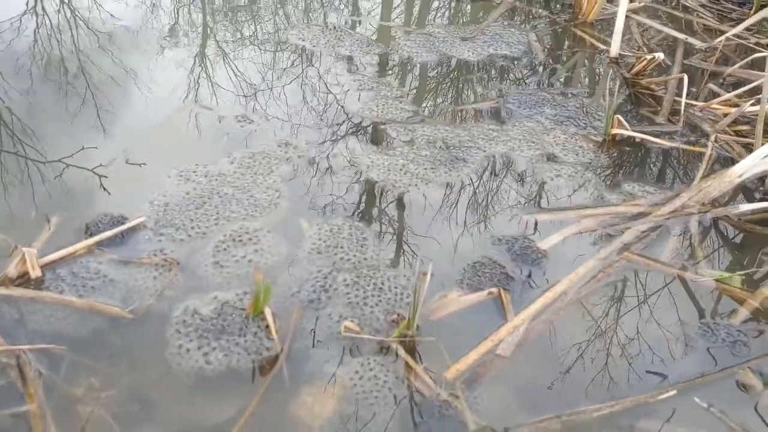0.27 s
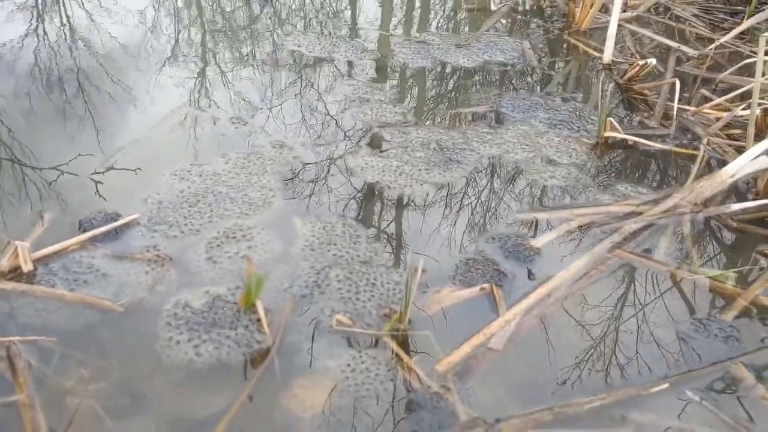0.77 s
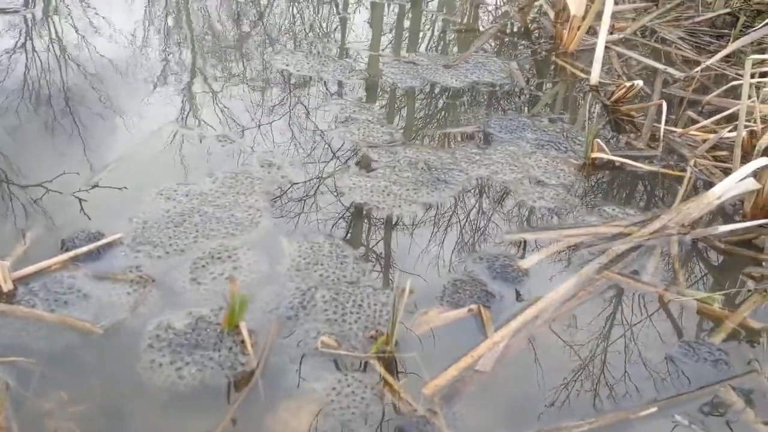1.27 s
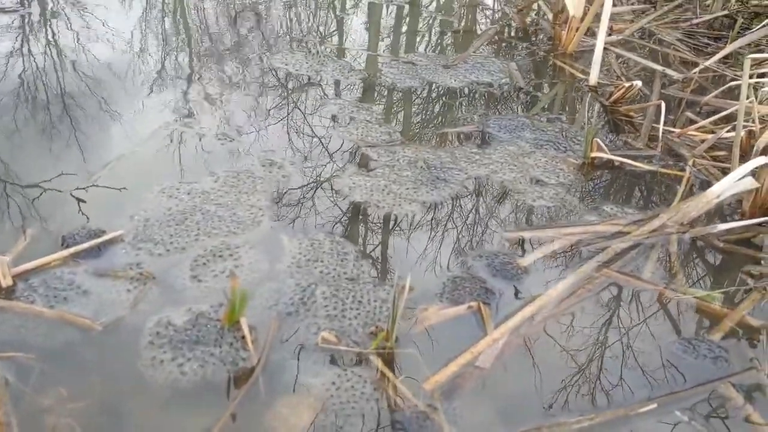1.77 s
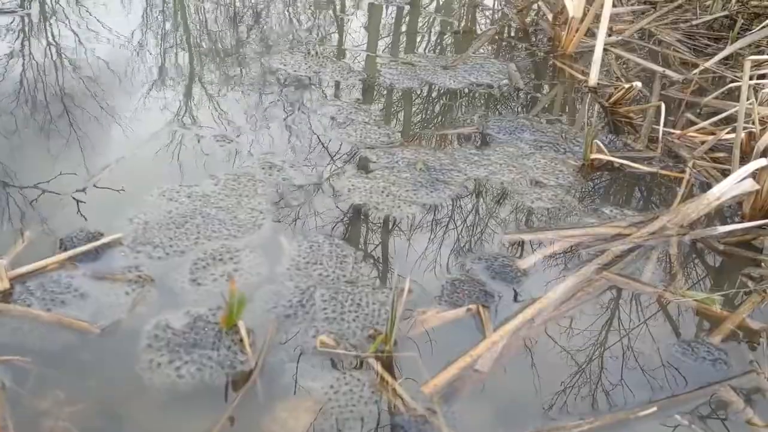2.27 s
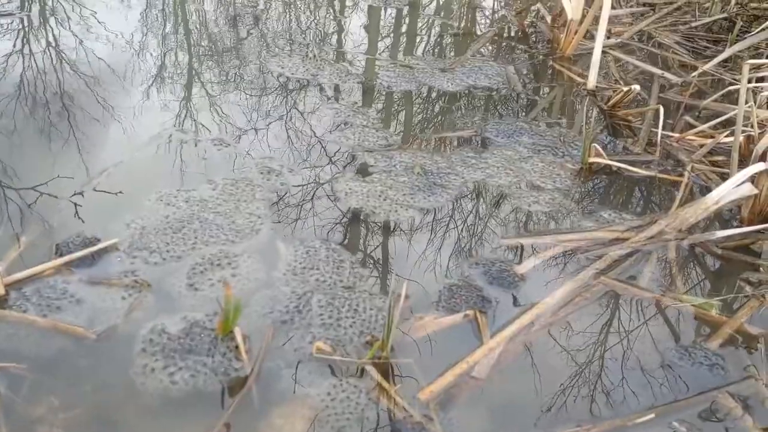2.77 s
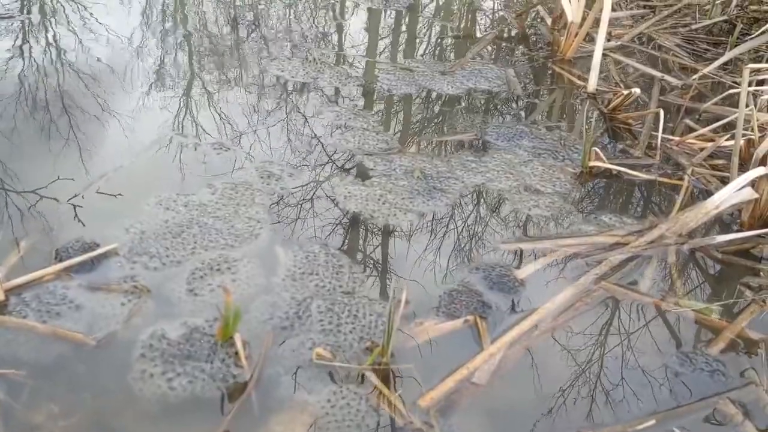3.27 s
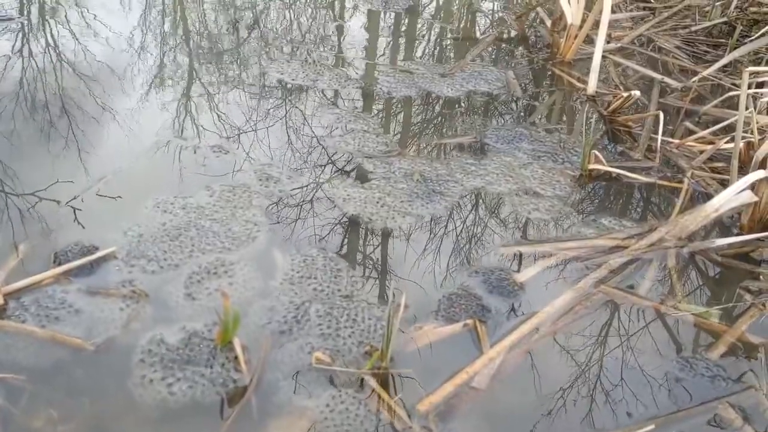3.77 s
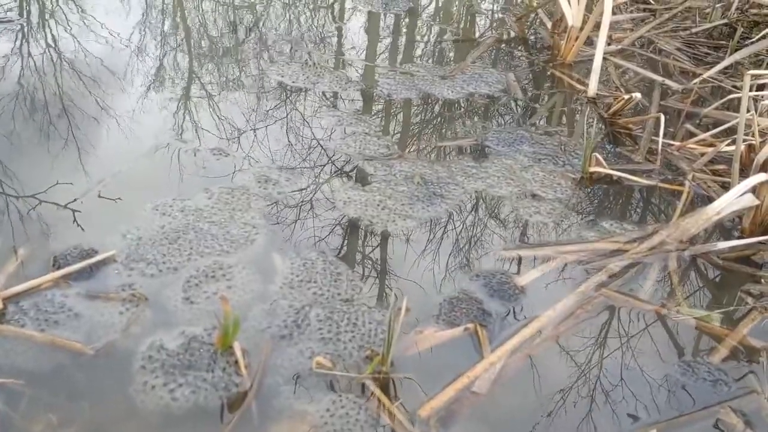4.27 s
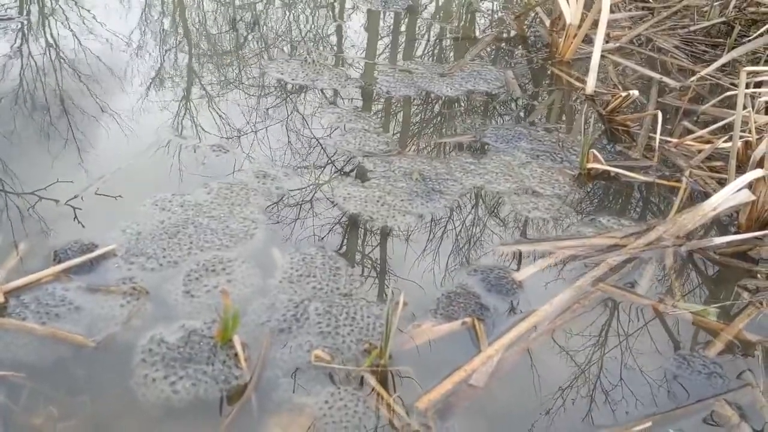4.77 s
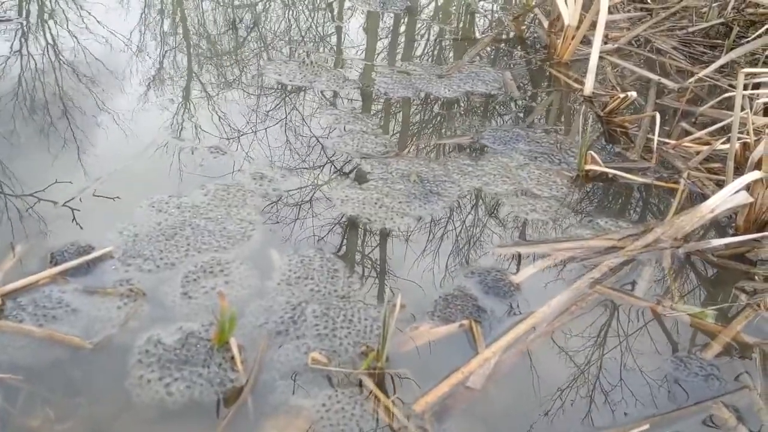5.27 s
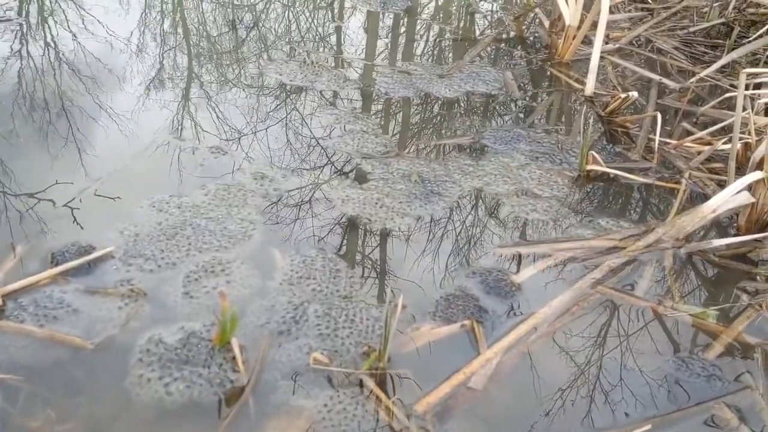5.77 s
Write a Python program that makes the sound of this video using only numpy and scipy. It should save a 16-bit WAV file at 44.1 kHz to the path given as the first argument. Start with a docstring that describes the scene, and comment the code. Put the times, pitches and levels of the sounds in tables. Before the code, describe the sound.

A quiet woodland pool bank, heard in close stereo. From the start, dry reed stalks snap sharply, mainly left of centre, with bright clicks around 0.1 seconds and again near 0.8, one duller knock falling to the right at about 0.7. Papery leaves tick and hiss between them, with small damp crunches. Another crackling cluster comes from 1.3 to 1.7. From about 1.8 to 2.5 a faint, distant bird whistles four falling slurs, then four low, rough two-voiced chirps from 2.6 to 3.3. The loudest, densest snapping bursts at 3.1 to 3.3, thinning until 4.1. The bird repeats four slurs from 4.2 to 4.9 in a calmer gap. A crack at 5.2 and light crackling from 5.4 close it. Throughout, soft low wind buffets, a distant traffic drone swelling slightly near 4.5, and airy hush.

```python
"""Snapping reeds at a woodland pool

Close by, dry stalks snap under shifting weight: noise bursts with abrupt fronts, split into three bands.
Leaves rustle as random ticks and hiss; stems knock as damped resonances; damp litter crunches in grains.
A songbird far off repeats a falling slur, then four low two-voiced chirps, then the slur again: gliding
sines with an octave, followed by a faint forest echo. Light wind rumbles on the microphone over the drone
of distant traffic and the hush of the wood, all three made of coloured noise."""
import sys
import numpy as np
from scipy import signal
from scipy.fft import rfft, irfft, next_fast_len
from scipy.io import wavfile
from scipy.ndimage import uniform_filter1d

SR = 44100
rng = np.random.default_rng(int(sys.argv[2]) if len(sys.argv) > 2 else 0)


def unload_wav(signal):
    """Save mono or channel-first audio to the path in sys.argv[1] as 16-bit WAV at rate SR, clipped to [-1, 1]."""
    wavfile.write(
        sys.argv[1],
        SR,
        np.round(np.clip(np.atleast_2d(signal).T, -1, 1) * 32767).astype(np.int16),
    )


N = 265305
TIME = np.arange(N) / SR

# loudest stalks snapping: crack_s, level_db (power of both ears together),
# woodiness_db (middle over treble), fizz_db (top over treble), left_minus_right_db
SNAPS = [(0.0134, -42.5, -15, 0, -9), (0.031, -53, 0.0, -8.0, -13), (0.0758, -45.5, -11, -5.0, -8),
         (0.1247, -37.5, -14, -1, -10), (0.1292, -27.5, 0, -6, -6), (0.1709, -38.5, -15, -12.0, -5.0),
         (0.2757, -48, -14.0, -15, -7), (0.3162, -45, -10, 3.0, -2.0), (0.3388, -49, -11, 4, -6),
         (0.4788, -48.5, -3, 3, -9), (0.5041, -51.0, -3.0, -1.0, -14), (0.5281, -62, -9, -7.0, -1.0),
         (0.5411, -46, -1, -17.0, -7), (0.5618, -65, -6.0, 3.0, -6.0), (0.5889, -53.0, 0, -4.0, -7),
         (0.7355, -40.5, 2, -14, 8), (0.7852, -53.5, -2.0, -7, -10), (0.8175, -30.5, 0, -8, -5),
         (0.8323, -43, 0, -5.0, -6), (0.8445, -35.5, 5, -5, -5.0), (0.8524, -41, -5, -5.0, -6.0),
         (1.3258, -44.5, -4, -6.0, -3), (1.3724, -48, 14, 4, -3), (1.3826, -59, -3.0, -11.0, -1.0),
         (1.3965, -61, 0.0, -3.0, 0), (1.4101, -58, 4, -3.0, -3.0), (1.4154, -47, -2, -9.0, -3.0),
         (1.4298, -45, -1, -4.0, -2.0), (1.4695, -40.5, -3.0, 8, -7), (1.4742, -40, 9, -1, 2),
         (1.5094, -52, 0, 5, 1), (1.5199, -42.0, -11, 10, -9), (1.5242, -38.5, -11, -4.0, -2.0),
         (1.5355, -38.5, 9, 1.0, -2.0), (1.5434, -44, 0, -6.0, -2.0), (1.6844, -48, 10, -3.0, -5),
         (2.1663, -52, 0.0, 2.0, 4.5), (2.1887, -43.5, 8, 3.0, -7), (2.2027, -50, -1.0, 3, -8),
         (2.3372, -51, -1.0, 12, -10), (2.4267, -36, -4.0, 4, -3), (2.6248, -37.5, -6, -9, -4.0),
         (2.6325, -46.0, -15, -12.0, -3.0), (2.695, -51.5, -6.0, -3, -4.0),
         (2.8076, -52.5, -4.0, -3.0, -6.0), (2.8315, -49, -8, 6, -5.0), (2.8635, -38, -9, -1, -6),
         (2.8776, -45.5, -4, -5.0, -1.0), (3.0495, -51, -11, -9.0, -5), (3.1002, -26, -9.5, -1, -5.5),
         (3.1205, -48, -13, 2, -5.0), (3.1339, -50.5, -13, 4, -3), (3.1492, -57, -14, 1, -4.0),
         (3.1737, -24.5, -6.5, 5, -7.5), (3.1778, -41, 2, -5.0, -4.0), (3.1867, -36, -15, 5, -10),
         (3.2046, -42.0, -6.0, -2.0, -4.0), (3.2093, -36.5, -4, -3.0, -4.0), (3.2377, -40, -9, 5, -5),
         (3.2466, -27.5, -7, -4.0, -6), (3.2627, -46, -17, -1, -8), (3.2791, -34.5, -5, 1, -7),
         (3.2946, -49, -2, -8, -1), (3.2986, -33, -7, 1.0, -9), (3.345, -44.5, -8, -3, -8),
         (3.351, -45, 0, 3, -3.0), (3.4243, -33, 6, 5, -9), (3.4984, -47.5, -5.0, 11, -11),
         (3.6016, -41, 2, 1, -2), (3.6745, -33, 4.5, 7.5, -3), (3.7357, -45.5, -9, -9, -9),
         (3.7883, -55.5, -9, -5.0, -8), (3.8597, -45, 2, -1, -2.0), (3.8795, -49.5, -9, -1, -5.0),
         (4.0245, -39, -7, 6, -11), (4.0385, -43.5, -12, -5, -2), (4.132, -53.5, -5, 8, -8.0),
         (5.1854, -34, 0.5, 2, -10.5), (5.2372, -52, 1, 0, -11), (5.3673, -51.5, -3, 1, -8),
         (5.4814, -41, -9, 3.0, -8.0), (5.501, -53, -2.0, -2.0, -5), (5.536, -58, -8.0, 5, -7),
         (5.5545, -48, -13, 9, -6), (5.5628, -47.0, -13, 0, -4.0), (5.5725, -42.5, -4, -11, -5),
         (5.5862, -43, 4, -1.0, -2), (5.601, -41.5, 0, -2.0, -6), (5.6128, -43, -2, -8, -6),
         (5.7785, -44, 4, -13, -4), (5.9257, -45.5, 7, -1.0, -6), (5.9506, -47, 0, 5, -3.0),
         (5.9827, -53, 0.0, 1, -6.0)]
# middle, treble and top range of a snap: low_hz, high_hz
SNAP_BANDS = [(1200, 7000), (7000, 12500), (12500, 16500)]
# random lesser stalks; rows: level over the leaves, woodiness, fizz, left minus right: typical_db, spread_db
SPLINTER_TRAITS = [(6.5, 6), (-4, 7), (-4, 7), (-2, 5)]
# shifts of weight pressing the dry leaves: peak_s, half_length_s, level_db
PRESSES = [(0.0, .03, -53), (0.135, .04, -53.5), (0.29, .07, -63), (0.56, .07, -61), (0.72, .05, -65.5),
           (0.86, .07, -63), (1.36, .06, -61), (1.515, .04, -56.5), (1.695, .04, -61.5), (2.03, .04, -68.5),
           (2.275, .06, -59), (2.46, 0.037, -65), (2.65, .05, -65.5), (2.9, .1, -69), (3.21, .08, -61),
           (3.42, 0.1, -67), (3.7, .11, -67), (4.1, .09, -68.5), (4.47, 0.037, -69.5), (4.64, .07, -65.5),
           (4.85, .07, -70.5), (5.195, .02, -65), (5.59, .05, -64), (5.77, .05, -66)]
# duller knocks of thick stems: crack_s, resonance_hz, level_db, half_width_octaves
KNOCKS = [(0.09, 1960, -59.5, 0.087), (0.7358, 675, -48.5, 0.41), (0.7498, 1700, -60, 0.54),
          (1.293, 2000, -60.5, 0.94), (1.326, 1560, -57.5, .5), (1.339, 1500, -66, .4),
          (1.36, 1290, -65, 0.34), (1.3735, 4280, -56.5, 0.045), (2.425, 1690, -56.5, 0.33),
          (3.1737, 3120, -54, 0.16), (3.4243, 3330, -49, 0.11)]
# damp litter squashed on the bank: peak_s, length_s, level_db
SQUASHES = [(0.128, 0.0033, -70), (0.138, 0.033, -83), (0.353, 0.082, -73), (0.91, 0.011, -66.5),
            (1.322, 0.02, -81), (2.295, 0.11, -73), (5.162, 0.025, -68.5)]
# falling slurs of the bird: accent_s, relative_level_db, lead_in_db (relative to the accent)
SLURS = [(1.886, -61, -10), (2.052, -59.5, 1.5), (2.265, -58.5, 2), (2.487, -58.5, 3), (4.313, -59.5, -11),
         (4.476, -58.5, -3), (4.688, -59, -2), (4.872, -60.5, -1)]
# course of one slur: from_accent_s, pitch_hz, fundamental_db, octave_db
SLUR_COURSE = [(-.112, 3500, -24, -40), (-.1, 3920, -13, -38), (-.084, 4110, -10.5, -32),
               (-.062, 3970, -12, -24), (-.04, 3620, -10.5, -9), (-.026, 3370, -7, -4),
               (-.01, 3110, -8, -12), (0, 2810, 5, -6), (.004, 2700, -6, -12), (.01, 2400, -22, -32)]
# low chirps of the bird: accent_s, pitch_hz, relative_level_db, length_ratio
CHIRPS = [(2.633, 2220, -51, 1.14), (2.847, 2184, -50, .9), (3.047, 2024, -53, 1.05),
          (3.252, 2007, -54, 0.84)]
# clear voice of a chirp: from_accent_s (before stretching), pitch_ratio, fundamental_db, octave_db
CLEAR_VOICE = [(-.021, .9, -26, -40), (-.014, .96, -6, -32), (-.006, 1, 0, -30), (.003, 1, 1, -30),
               (.011, .96, -2, -28), (.017, .88, -11, -28), (.024, .72, -26, -40)]
# rough second voice of a chirp: from_accent_s (before stretching), pitch_hz, fundamental_db, octave_db
ROUGH_VOICE = [(-.026, 1200, -32, -26), (-.019, 1430, -24, -9), (-.012, 1640, -26, -14),
               (0, 1880, -26, -21), (.012, 1660, -16, -13), (.021, 1480, -10, -6), (.028, 1340, -16, -12),
               (.035, 1180, -26, -24)]
# relative power spectra: frequency_hz, density_db (per Hz)
REED_SPECTRUM = [(1000, -20.5), (2300, -29.5), (3200, -15), (4800, -8.5), (5600, 0), (6600, -4),
                 (8100, -5.5), (9400, 1), (10200, -3), (11600, -3), (12500, -12.5), (13900, -4),
                 (15300, -9.5), (16500, -20.5)]
LEAF_SPECTRUM = [(1000, -14.5), (2500, -11.5), (4500, 2), (5800, -3), (8000, -3.5), (9500, 1.5),
                 (11500, -6), (12700, -9.5), (14000, 2.5), (15300, -6), (16300, -29)]
LITTER_SPECTRUM = [(400, -7), (900, -10), (1500, 3), (3000, -5.5), (6000, -2.5), (12000, -21)]
AIR_SPECTRUM = [(180, -24), (300, -1), (511, -3.5), (667, -10.5), (1560, -18), (1690, -18.5), (3030, -16.5),
                (4830, -20.5), (5700, -18.5), (14200, -22.5), (16000, -38)]
WIND_SPECTRUM = [(12, -2), (28, 3), (50, -5.5), (80, -11.5), (130, -20), (250, -35.5), (500, -51.5)]
TRAFFIC_SPECTRUM = [(40, -13), (90, -3.5), (140, -2), (190, -6.5), (240, -9), (300, -22.5), (480, -41),
                    (800, -30.5)]
# steady breeze on the microphone: time_s, level_db
BREEZE = [(0, -47.5), (.6, -49.5), (2.0, -49.5), (3.2, -54), (3.8, -49), (4.75, -58.5), (5.2, -48),
          (6.02, -52.5)]
# single buffets on top of the breeze: peak_s, level_db
BUFFETS = [(.06, -40.5), (.17, -40), (.29, -43.5), (.78, -39.5), (1.04, -41.5), (1.97, -48), (2.11, -43.5),
           (2.909, -40.5), (3.32, -52), (3.99, -49.5), (5.3, -42), (5.83, -41.5), (6.0, -44.5)]
# course of the traffic: time_s, relative_level_db
ROAD = [(0, -66), (1.2, -65), (2.4, -63), (3.6, -65), (4.6, -63.5), (6.02, -63.5)]
# tones that swell out of the traffic: peak_s, length_s, frequency_hz, level_db
DRONES = [(3.25, .4, 136, -65), (4.5, .22, 139, -59), (4.8, .4, 530, -79)]

LEAD = SR // 200   # samples kept before each crack
SPLINTERS_PER_S, SPLINTER_RATE_POWER = 40, 0.6   # rate at the mean pressure; exponent of the pressure
RUB_SHARE = 0.25   # amplitude of hiss against ticks
RESTING_LEAVES_DB = -75   # the leaves never lie quite still
BUFFET_HALF_S = 0.027
# reflections from the reed bed against the direct sound
SNAP_ECHO_DB, LEAF_ECHO_DB, BANK_ECHO_DB = -14, -6.5, -8
CUTOFF_HZ = 16100


def reeds(pressure, lag_s=.000083, lag_spread_s=.000008):
    """Brittle fracture: each stalk cracks with its own mix of bands and its own level between the ears."""
    s, db, woodiness, fizz, left_db = np.vstack([SNAPS, splinters(pressure)]).T
    lags = lag_s + lag_spread_s * rng.standard_normal(len(s))
    stalk = colour(signal.unit_impulse(N), REED_SPECTRUM)[:LEAD]
    bursts = fractures(len(s), tear_s=.00065, crack=3.0, lead_s=.0003)
    cracks = signal.lfilter(stalk, [1], bursts)

    # the three bands together carry the level of the snap
    treble_db = db - 10 * np.log10(1 + from_db(woodiness) ** 2 + from_db(fizz) ** 2)
    mixed = 0
    for band_hz, share_db in zip(SNAP_BANDS, (woodiness, 0, fizz)):
        band = signal.butter(4, band_hz, "band", fs=SR, output="sos")
        mixed = mixed + at_level(signal.sosfilt(band, cracks), treble_db + share_db)

    left_over_right = from_db(left_db[:, None])
    right = mixed / np.sqrt(1 + left_over_right ** 2)
    left = right * left_over_right
    return np.array([placed(s, left), placed(s, delayed(right, lags[:, None]))])


def splinters(pressure, count=400):
    """Stress-driven failure: rows like those of the snaps, more frequent and louder under pressure."""
    rate = SPLINTERS_PER_S * (pressure / pressure.mean()) ** SPLINTER_RATE_POWER
    due = np.cumsum(rate) / SR
    chance = rng.uniform(-0.82, 1, (count, 5))
    at = np.searchsorted(due, np.arange(count) + 1 + chance[:, 0])   # uneven intervals
    inside = at < N
    typical, spread = np.transpose(SPLINTER_TRAITS)
    traits = typical + spread * chance[inside, 1:]
    at = at[inside]
    level_db = 20 * np.log10(pressure[at]) + traits[:, 0]
    return np.c_[at / SR, level_db, traits[:, 1:]]


def fractures(count, tear_s, crack, lead_s=0.00042):
    """Fibre rupture: noise grows as fibres give, peaks in a crack and decays with the tear; one a row."""
    t = (np.arange(4 * LEAD) - LEAD) / SR
    envelope = np.exp(-np.maximum(t / tear_s, -t / lead_s))
    bursts = rng.standard_normal((count, len(t))) * envelope
    bursts[:, LEAD] = crack
    return bursts


def leaves(pressure, grains_per_s=520, spread_db=6.0):
    """Friction noise: countless tiny ticks of uneven size over the soft hiss of blades rubbing."""
    sizes = from_db(spread_db * np.minimum(rng.exponential(1, N), 3)) * rng.choice([-1, 1], N)
    ticks = rms_one(sizes * (rng.random(N) < grains_per_s / SR))
    rustle = rms_one(ticks + RUB_SHARE * rng.standard_normal(N))
    return colour(rustle * pressure, LEAF_SPECTRUM)


def bank():
    """Heavy contact on the bank: thick stems knock by resonance."""
    return sum(knock(*row) for row in KNOCKS) + litter()


def knock(s, hz, db, half_band_octaves):
    """Impact resonance: a crack in a thick stem, heard through its quickly damped resonance."""
    half = np.clip(half_band_octaves, .02, 1.2)
    band = signal.butter(1, hz * 2 ** np.array([-half, half]), "band", fs=SR, output="sos")
    ring = signal.sosfilt(band, fractures(count=1, tear_s=.0005, crack=6.0))
    return placed([s], at_level(ring, [db]))


def litter(grains_per_s=1500):
    """Granular crushing: damp litter gives way in random grains, with a dull crunch."""
    load = sum(from_db(db) * np.exp(-.5 * ((TIME - s) / length) ** 2) for s, length, db in SQUASHES)
    grains = rms_one(rng.standard_normal(N) * (rng.random(N) < grains_per_s / SR))
    return colour(grains * load, LITTER_SPECTRUM)


def reed_bed(x, t60, bright_hz=6000):
    """Dense reflection: noise follows the sound's power and dies quickly, low and high bands apart."""
    r = from_db(-120 / (t60 * SR))   # decay of power per sample
    out = 0
    for kind in ("low", "high"):
        band = signal.butter(3, bright_hz, kind, fs=SR, output="sos")
        power = signal.lfilter([1 - r], [1, -r], signal.sosfilt(band, x) ** 2 + 1e-20)
        reflections = colour(wide_noise(alike=1.0), REED_SPECTRUM)
        out = out + np.sqrt(power) * rms_one(signal.sosfilt(band, reflections))
    return out


def scatter(x, t60):
    """Diffuse reflection from stalks or trunks: decaying noise tails, different on each side."""
    t = TIME[:SR]
    decay = from_db(-60 * t / t60)
    tails = [rms_one(rng.standard_normal(SR) * decay) / np.sqrt(SR) for side in range(2)]
    return np.array([signal.fftconvolve(x, tail)[:N] for tail in tails])


def bird(slur_db=-2.0, chirp_db=-7.5, forest_db=-13):
    """Two-sided syrinx: slurs use one voice, chirps sound both sides at once; a faint echo follows."""
    song = 0
    for s, db, lead_db in SLURS:
        swell_db = lead_db * np.clip((s - TIME) / 0.046, 0, 1)
        slur = whistle(s, SLUR_COURSE, 1, waver=.016, flutter_db=3.0, hoarse=.025)
        song = song + from_db(db + slur_db + swell_db) * slur
    for s, hz, db, stretch in CHIRPS:
        pace = [stretch, 1, 1, 1]   # stretches time only
        clear = whistle(s, np.multiply(CLEAR_VOICE, pace), hz, waver=.004, flutter_db=2.5)
        rough = whistle(s, np.multiply(ROUGH_VOICE, pace), 1, waver=.022, flutter_db=4.5)
        song = song + from_db(db + chirp_db) * (clear + rough)
    return song + from_db(forest_db) * scatter(song, t60=.3)


def whistle(s, shape, pitch_scale, waver, flutter_db, hoarse=0.0):
    """Frequency modulation: a gliding sine and its octave, unsteady, with optional hoarseness before the accent."""
    out = np.zeros(N)
    on = (TIME > s + shape[0][0]) & (TIME < s + shape[-1][0])
    hz, first_db, octave_db = curve(shape, TIME[on] - s)
    drifts = rms_one(uniform_filter1d(rng.standard_normal((3, SR // 4)), size=50))
    unsteady, first, octave = drifts[:, :len(hz)]
    lead_in = np.clip((TIME[on] - s) / shape[0][0], 0, 1)   # 1 at the start, 0 from the accent on
    pitch = hz * pitch_scale * (1 + (waver + hoarse * lead_in) * unsteady)
    phase = 2 * np.pi * np.cumsum(pitch) / SR
    fundamental = from_db(first_db + flutter_db * first) * np.sin(phase)
    overtone = from_db(octave_db + flutter_db * octave) * np.sin(2 * phase)
    out[on] = fundamental + overtone
    return out


def wind():
    """Turbulent pressure on the microphone ports: low noise under a breeze with added buffets."""
    (breeze,) = curve(BREEZE)
    gusts = swells([(s, BUFFET_HALF_S, db) for s, db in BUFFETS], breeze)
    return gusts * colour(wide_noise(alike=0.75), WIND_SPECTRUM)


def traffic(road_db=4.0, drone_width_hz=7.4):
    """Distant broadband sources: low noise, with narrow resonances excited by noise as swelling tones."""
    (road,) = curve(ROAD)
    hum = from_db(road + road_db) * colour(wide_noise(alike=0.83), TRAFFIC_SPECTRUM)
    r = np.exp(-np.pi * drone_width_hz / SR)   # pole radius
    for s, length, hz, db in DRONES:
        poles = [1, -2 * r * np.cos(2 * np.pi * hz / SR), r * r]
        tone = rms_one(signal.lfilter([1], poles, rng.standard_normal(N)))
        hum = hum + from_db(db) * tone * np.exp(-.5 * ((TIME - s) / length) ** 2)
    return pan(hum, left_db=-3.0)


def air(level_db=-67.5):
    """Diffuse field: the hush of the wood, steady noise almost unrelated between the ears."""
    return pan(from_db(level_db) * colour(wide_noise(alike=0.0066), AIR_SPECTRUM), left_db=-2.0)


def swells(rows, resting_db):
    """Power addition: smooth swells (peak_s, half_length_s, level_db) add to a resting level; a gain."""
    power = sum(from_db(db) ** 2 * np.exp(-((TIME - s) / half) ** 2) for s, half, db in rows)
    return np.sqrt(from_db(resting_db) ** 2 + power)


def colour(x, spectrum):
    """Minimum-phase filtering: causal, of unit power gain, falling away beyond the spectrum's ends."""
    size = 2 * next_fast_len(N // 2 + 4096)
    hz, db = np.transpose(spectrum)
    octave, knots = np.log2(np.maximum(np.fft.rfftfreq(size, 1 / SR), 1)), np.log2(hz)
    beyond = abs(octave - np.clip(octave, knots[0], knots[-1]))
    gain = from_db(np.interp(octave, knots, db) - 18 * beyond)   # 18 dB per octave
    # folding the cepstrum onto positive time gives the minimum phase
    cepstrum = irfft(np.log(rms_one(gain)))
    cepstrum[1:size // 2] *= 2
    cepstrum[size // 2 + 1:] = 0
    return irfft(rfft(x, size) * np.exp(rfft(cepstrum)))[..., :N]


def wide_noise(alike):
    """Interaural coherence: stereo white noise with a given left-right correlation."""
    mid, side = rng.standard_normal((2, N))
    alike = np.clip(alike, -1, 1)
    return rms_one(np.sqrt(1 + alike) * mid + np.sqrt(1 - alike) * np.array([side, -side]))


def pan(x, left_db):
    """Interaural level difference, shared equally between the ears."""
    return x * from_db([[left_db / 2], [-left_db / 2]])


def at_ports(x, left_db, lag_s):
    """Arrival difference: two ports get near sound a moment apart and unequally loud."""
    return pan(np.array([x, delayed(x, lag_s)]), left_db)


def delayed(x, lag_s):
    """Shift theorem: a linear phase delays by a fraction of a millisecond."""
    length = x.shape[-1]
    size = next_fast_len(length + 64)
    turn = np.exp(-2j * np.pi * np.fft.rfftfreq(size, 1 / SR) * lag_s)
    return irfft(rfft(x, size) * turn, size)[..., :length]


def at_level(bursts, db):
    """Energy normalisation: scale each burst to a level, its energy taken as the rms over 3 ms."""
    energy = np.sum(bursts ** 2, axis=-1, keepdims=True)
    return from_db(db)[..., None] * bursts * np.sqrt(.003 * SR / energy)


def placed(times, bursts):
    """Superposition: lay the bursts out so that each cracks at its time."""
    out = np.zeros(N + SR)
    for s, burst in zip(times, bursts):
        at = max(round(s * SR), 0)
        out[at:at + len(burst)] += burst
    return out[LEAD:LEAD + N]


def curve(rows, at=TIME):
    """Linear interpolation: each column of a table, joined by straight lines."""
    s, *columns = np.transpose(rows)
    return [np.interp(at, s, c) for c in columns]


def from_db(db):
    """Logarithmic level: decibels to amplitude gain."""
    return 10 ** (np.asarray(db) / 20)


def rms_one(x):
    """Power normalisation: scale to unit mean square."""
    return x / np.sqrt(np.mean(x ** 2) + 1e-20)


def scene():
    """Superposition of near crackle, its short reflections, the far bird and the background."""
    pressure = swells(PRESSES, RESTING_LEAVES_DB)
    snaps, rustle, dull = reeds(pressure), leaves(pressure), bank()
    near = snaps + at_ports(rustle, left_db=-1.0, lag_s=.000074) + pan(dull, left_db=-2.0)
    bright = from_db(SNAP_ECHO_DB) * snaps[1] + from_db(LEAF_ECHO_DB) * rustle
    echoes = reed_bed(bright, t60=0.037) + from_db(BANK_ECHO_DB) * scatter(dull, t60=0.02)
    return near + echoes + bird() + wind() + traffic() + air()


def record(dry):
    """Band limiting: a steep elliptic low-pass cuts the top."""
    low_pass = signal.ellip(10, .2, 80, CUTOFF_HZ, fs=SR, output="sos")
    return signal.sosfilt(low_pass, dry)


dry = scene()
out = record(dry)
unload_wav(out)
```